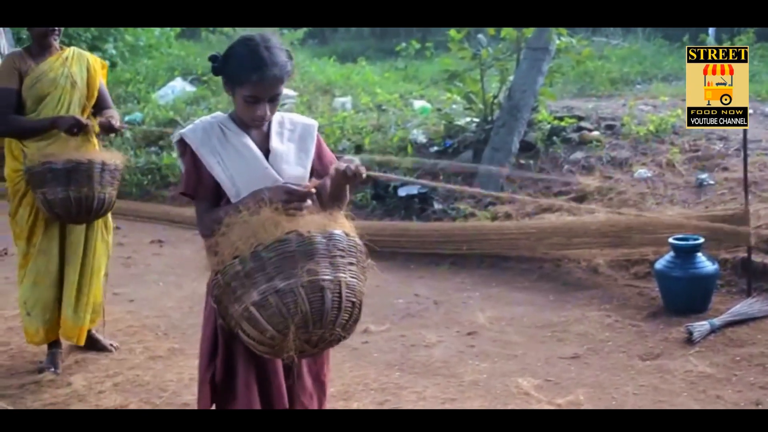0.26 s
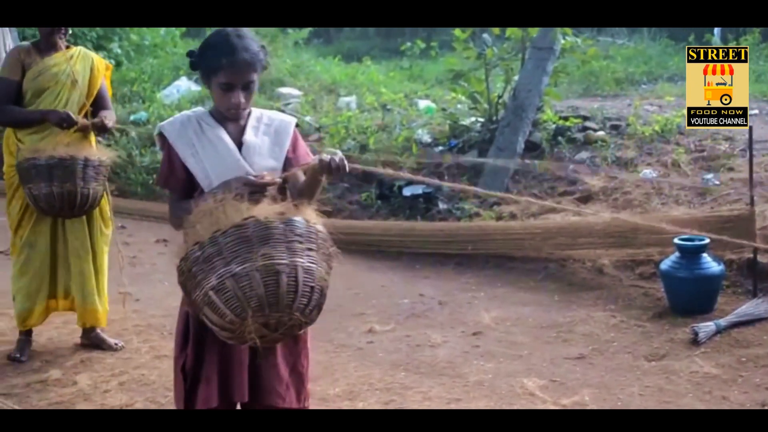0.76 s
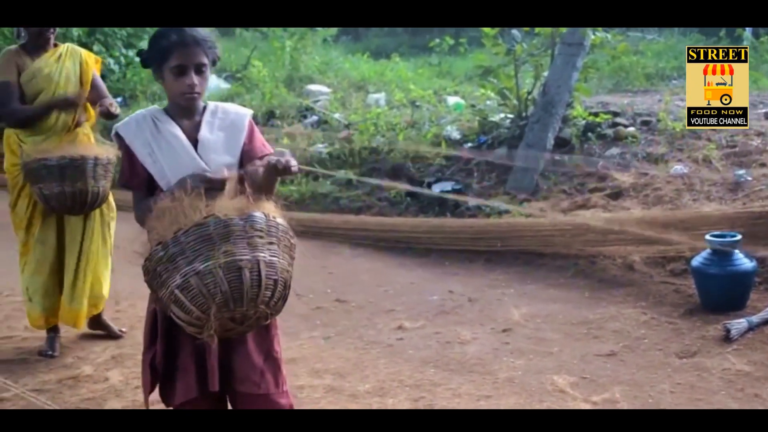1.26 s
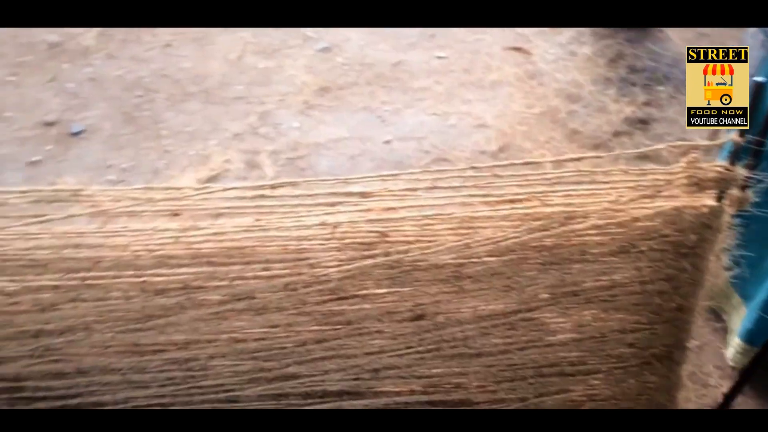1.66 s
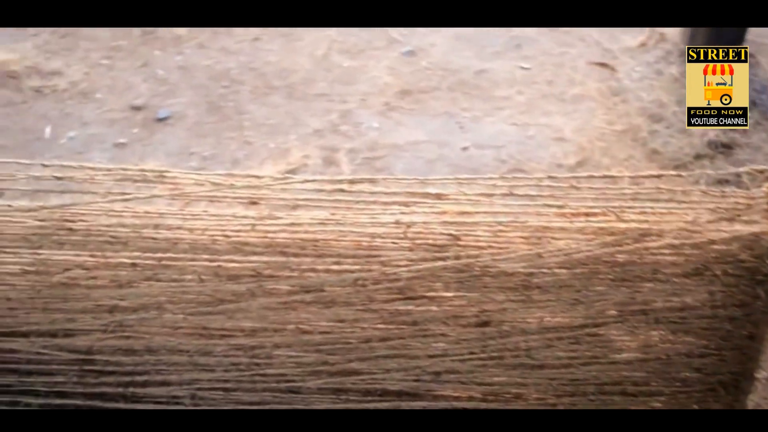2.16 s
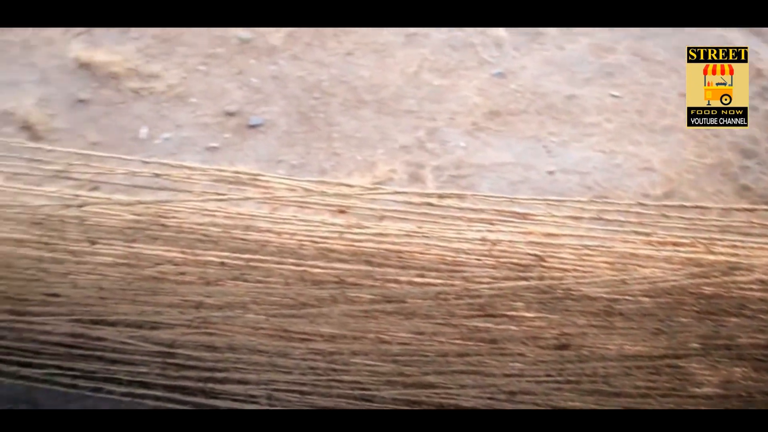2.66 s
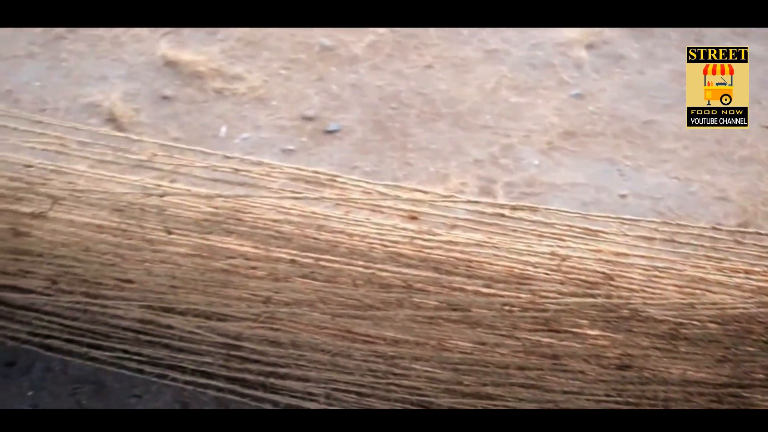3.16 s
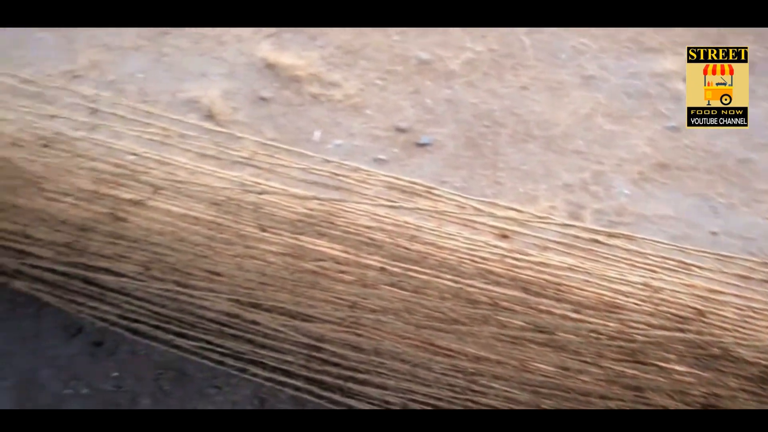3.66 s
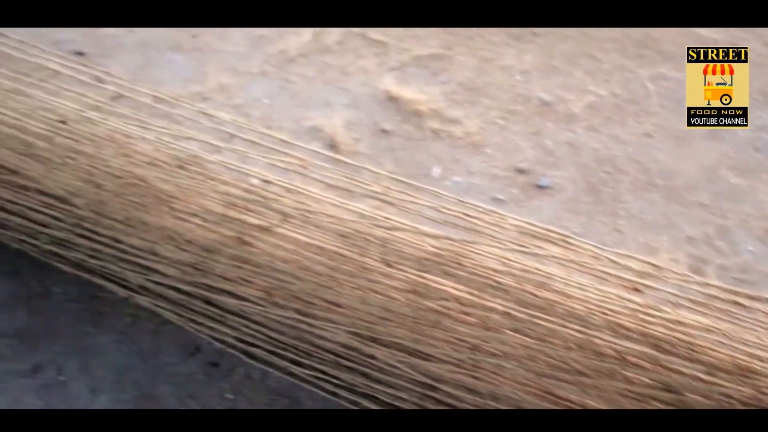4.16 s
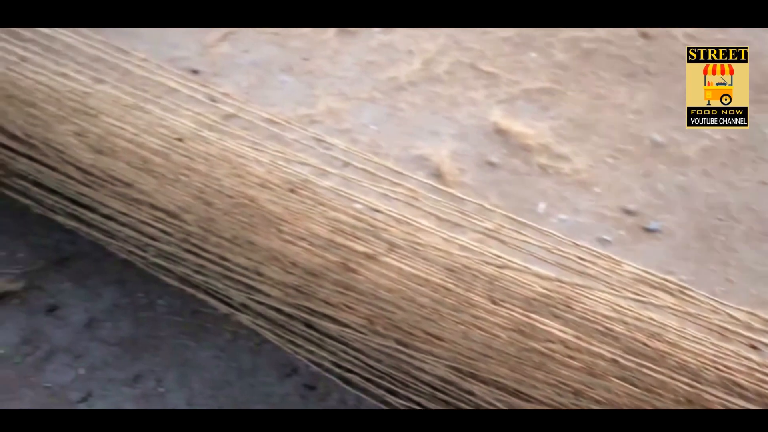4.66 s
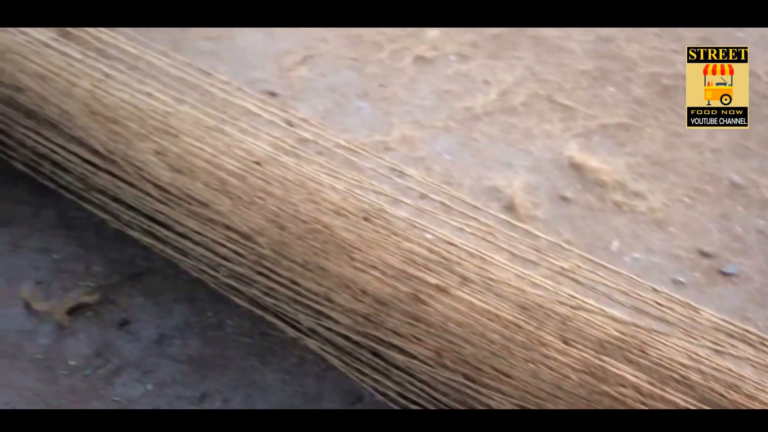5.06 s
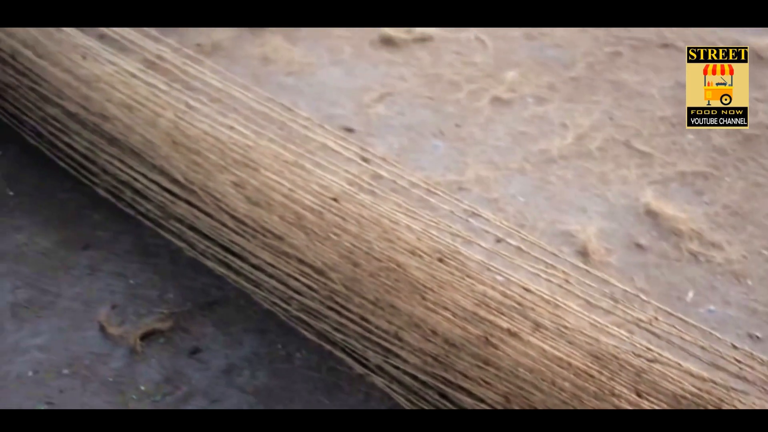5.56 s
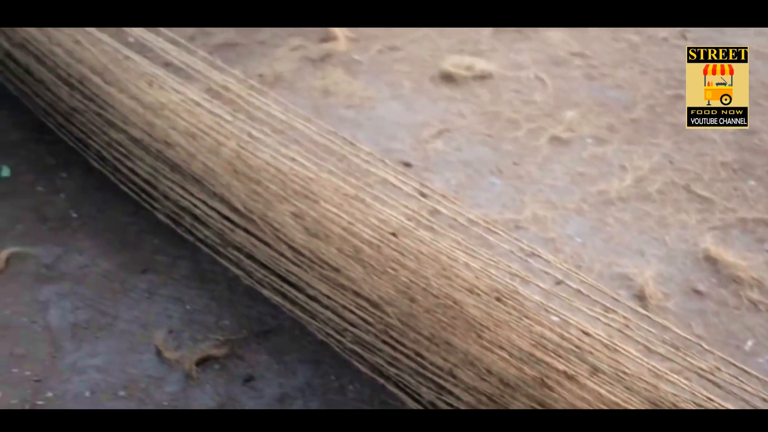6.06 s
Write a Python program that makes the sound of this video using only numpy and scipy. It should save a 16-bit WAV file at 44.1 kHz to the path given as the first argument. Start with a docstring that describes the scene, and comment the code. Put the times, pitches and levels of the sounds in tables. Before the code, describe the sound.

Two views of a hand-cranked twisting wheel outdoors, dry and without echo. First quiet, from the far end: brushing fibre, dull faint rattling, a slight whine. Then an abrupt cut to much louder close clatter of loose iron spindles and gears on a shaking wooden frame, with knocks, woody thumps and squeaky chirps. The listener walks away along the yarn, so the rattle thins and its fluttering, woody buzz becomes more noticeable.

```python
"""A hand-cranked wheel twists coir yarn in a village yard, heard first from the spinners' end, then beside it.
Loose iron spindles and gears chatter and ring, and shake the wooden frame; the clatter surges with each turn.
A wobbling gear thumps the frame, a dry bearing chirps, and the taut yarn flutters with the wheel's shaking.
Dry fibre rustles and the iron whines faintly at the spinners' end; open air is heard beside the wheel.
A faint low drone comes and goes. Beside the wheel, the listener drifts slowly away along the yarn."""
import sys
import numpy as np
from scipy import signal
from scipy.fft import rfft, irfft, next_fast_len
from scipy.io import wavfile
from scipy.ndimage import uniform_filter1d

SR = 44100
rng = np.random.default_rng(int(sys.argv[2]) if len(sys.argv) > 2 else 0)


def wav_out(sig):
    """Save sig, one row per channel (or a flat mono array), as 16-bit PCM at SR to the path in sys.argv[1]."""
    wavfile.write(sys.argv[1], SR, np.round(np.clip(np.atleast_2d(sig).T, -1, 1) * 32767).astype(np.int16))


N = 278271
T = np.arange(N) / SR  # seconds
# the filters work on a longer, padded stretch; HZ lists its frequencies
SIZE = next_fast_len(N + SR // 4, real=True) * 2
HZ = np.maximum(np.arange(SIZE // 2 + 1) * SR / SIZE, 1)

CLOSE_S = 1.482  # the listening place jumps to the wheel
WHEEL_M, WALK_M_S = 0.86, 0.6  # nearest distance to the wheel, and walking speed along the yarn

# Gear teeth catching with a knock. Each row: time in seconds, strength in dB before mixing,
# change of effort just before the knock in dB (negative where the gears run slack).
KNOCKS = [(0.718, -36, 4.5), (.857, -36, 7), (.942, -36, 6), (1.007, -39, 3.5), (1.172, -38, -1),
          (1.484, -40, 2), (1.522, -33.5, -6.5), (1.6312, -31.5, 2), (1.779, -23.5, -6), (1.81, -26.5, -3),
          (2.0614, -29, 2), (2.137, -30, -7), (2.238, -34, -1), (2.367, -39, -5.5), (2.4492, -30, -1),
          (2.712, -25.5, 0.5), (2.91, -28, -5), (3.003, -37, -7), (3.1176, -26, -1), (3.147, -30, -16),
          (3.185, -26, 0), (3.226, -31, 0.5), (3.3043, -30, 1), (3.335, -25, -1), (3.388, -43, -3.5),
          (3.709, -31.5, 4), (3.796, -33.5, -2), (3.9243, -36, -2), (3.968, -30.5, -5), (4.066, -33, 1),
          (4.096, -31.5, 5), (4.18, -30, 1), (4.2248, -40, -4.5), (4.2562, -36, -3), (4.2936, -32, 0.5),
          (4.365, -31, -4), (4.423, -31, 0), (4.6064, -45, 3.5), (4.778, -30, 2), (4.826, -32, 1),
          (4.957, -49, -4), (4.998, -34, -1.5), (5.094, -38, 3.5), (5.229, -33.5, -1), (5.322, -34.5, -5),
          (5.376, -34, 1.5), (5.431, -33.5, -5), (5.56, -34, -1), (5.597, -41, 0), (5.637, -41, 0.5),
          (5.711, -34, -3), (5.762, -33.5, 3.5), (5.9094, -42, -2), (6.135, -34.5, -0.5), (6.232, -37, -2),
          (6.262, -35, 0)]
# Chirps of the dry bearing. Each row: middle in seconds, half length in seconds, pitch in Hz,
# strength in dB, strength of the upper partial in dB relative to the pitch.
CHIRPS = [(0.518, .017, 8090, -72, -15), (.63, 0.0087, 8100, -68, -11), (1.71, 0.013, 7880, -43.5, -11),
          (1.712, .014, 4630, -41, -30), (1.744, 0.014, 8070, -44.5, -10.5),
          (1.935, 0.045, 6800, -53.5, -30), (1.937, 0.019, 4380, -45, -30), (1.99, 0.014, 4420, -38, -32),
          (2.022, 0.013, 4440, -37.5, -32), (2.053, .011, 4370, -45, -30),
          (2.147, 0.0084, 4300, -39.5, -28), (2.167, .006, 4390, -38, -28), (2.6, 0.023, 4600, -41.5, -26),
          (2.614, 0.027, 10300, -49.5, -4), (2.626, 0.01, 4530, -32, -26), (2.7, .022, 10500, -64, -6),
          (2.926, 0.0085, 7600, -47, -10), (3.34, 0.0087, 7660, -46.5, -9), (3.287, .012, 7980, -56, -10),
          (3.522, 0.0062, 10350, -64, -6), (3.982, 0.0059, 8000, -50, -12), (4.08, 0.013, 10350, -52, -6),
          (4.302, 0.011, 4530, -45, -30), (4.372, 0.0068, 4400, -49, -30), (4.607, 0.0091, 4510, -50, -32),
          (4.843, 0.014, 4510, -45, -13), (6.157, 0.011, 4430, -51, -30), (6.22, 0.057, 6266, -61.5, -30)]
# Resonances of the wooden frame. Each row: frequency in Hz, width in Hz, relative strength in dB.
FRAME_MODES = [(411, 110, -7.5), (919, 70, 4.5), (986, 45, -0.5), (1076, 82, 2.5), (1354, 85, 0),
               (1630, 180, 2), (2093, 45, 2.5)]
# Loudness of the fibre rustle at the spinners' end. Each row: time in seconds, level in dB.
FIBRE_LEVEL = [(.06, -48.5), (.3, -54), (.4, -51.5), (.47, -53.5), (.78, -55.5), (.87, -54.5), (1.05, -57),
               (1.4, -58)]


def undb(db):
    """Turn decibels into a plain amplitude factor."""
    return 10 ** (np.asarray(db) / 20)


def unit(x):
    """Scale to rms 1."""
    return x / np.sqrt(np.mean(x ** 2))


def curves(rows):
    """Each column of a table as a curve in time."""
    s, *columns = np.transpose(rows)
    return [np.interp(T, s, column) for column in columns]


def response(points):
    """Gain per frequency of a smooth spectrum, drawn through points of Hz and dB."""
    hz, db = np.transpose(points)
    return undb(np.interp(np.log(HZ), np.log(hz), db))


def ring(x, gain):
    """Causal filter with that gain, so that a body sounds only after each blow."""
    # folding the cepstrum forward in time gives the minimum-phase filter
    cepstrum = irfft(np.log(gain))[:SIZE // 2]
    cepstrum[1:] *= 2
    return irfft(rfft(x, SIZE) * np.exp(rfft(cepstrum, SIZE)))[:N]


def band(x, order, low_hz, high_hz):
    """Keep mainly what lies between two frequencies."""
    return signal.sosfilt(signal.butter(order, [low_hz, high_hz], "band", fs=SR, output="sos"), x)


def shelf(x, edge_hz, db, order=6):
    """Raise or lower everything above an edge."""
    treble = signal.sosfiltfilt(signal.butter(order, edge_hz, "high", fs=SR, output="sos"), x)
    return x + (undb(db) - 1) * treble


def walk(rate):
    """Smooth random drift with a spread near 1; it takes this many random steps a second."""
    k = int(SR / rate)
    steps = np.repeat(rng.standard_normal(N // k + 1), k)
    return 1.3 * uniform_filter1d(uniform_filter1d(steps, k), k)[:N]


def flicker(rate):
    """Quick random changes without slow swells, with a spread of 1."""
    drift = walk(rate)
    return unit(drift - uniform_filter1d(drift, size=SR // 25))


def bump(middle_s, half_s):
    """Smooth bell-shaped swell in time, with a peak of 1."""
    return np.exp(-((T - middle_s) / half_s) ** 2 / 2)


def fade(x, decay_s):
    """Give every impulse an exponential tail."""
    return signal.lfilter([1], [1, -np.exp(-1 / (decay_s * SR))], x)


def chatter(rate, scatter_db, decay_s, rub):
    """Contact force of loose parts: unevenly spaced taps of uneven strength over steady rubbing."""
    chance = rng.standard_normal((4000, 2))
    at = (np.cumsum(np.exp(.45 * chance[:, 0])) / rate * SR).astype(int)
    tap_power = undb(scatter_db * chance[at < N, 1]) ** 2
    power = fade(np.bincount(at[at < N], tap_power, N), decay_s)
    # the heavy wheel keeps the mean effort even
    power = power / (uniform_filter1d(power, size=SR // 24) + 1e-9)
    return np.sqrt((power + rub) / (1 + rub))


def grit(scatter_db):
    """Rough surfaces meeting: a dense stream of tiny clicks."""
    return unit(rng.standard_normal(N) * undb(scatter_db * rng.standard_normal(N)))


def together(*forces):
    """Unrelated forces add in power."""
    return np.sqrt(sum(force ** 2 for force in forces))


def sing(push, modes, flare_db, damping=1):
    """Resonances rung by a scraping contact; each flares and fades as the contact point wanders."""
    drive, out = push * grit(scatter_db=4), 0
    for hz, width, db in modes:
        # a narrower resonance rings longer
        pole = np.exp((2j * hz - width * damping) * np.pi / SR)
        share = undb(db + flare_db * walk(60))
        out = out + 2 * signal.lfilter([1 - abs(pole)], [1, -pole], drive * share).real
    return out


def patchy(x, patchy_db, rate):
    """Every contact has its own colour: half-octave bands flicker on their own."""
    place = np.clip(2 * np.log2(HZ / 500), 0, 9)
    spectrum = rfft(x, SIZE)
    out = 0
    for k in range(10):
        one_band = irfft(spectrum * np.maximum(1 - abs(place - k), 0))[:N]
        out = out + one_band * undb(patchy_db * flicker(rate))
    return out


def tones(rows, waver, flutter_db, rate, rasp=0):
    """Swelling tones, unsteady in pitch and strength; rasp jerks their phase."""
    drift = np.cumsum(1 + waver * walk(2 * rate)) / SR
    jerk = rasp * walk(3 * rate)
    out = np.zeros(N)
    for s, half, hz, db in rows:
        on = abs(T - s) < 4 * half
        swell = undb(db) * np.exp(-((T[on] - s) / half) ** 2 / 2)
        out[on] += swell * np.sin(2 * np.pi * hz * drift[on] + jerk[on])
    return out * undb(flutter_db * walk(rate))


def walked():
    """Metres the listener has gone along the yarn."""
    return WALK_M_S * np.maximum(T - CLOSE_S, 0)


def distance():
    """Metres from the walking listener to the wheel; it stays at its nearest value before the walk."""
    return np.hypot(WHEEL_M, walked())


def crank(follow):
    """Effort in dB: it swells to each push and eases half a turn later; parts follow that swing more or less."""
    # The hardest push of each turn of the crank. Each row: time in seconds, middle effort in dB,
    # swing above and below it in dB, before the follow factor.
    pushes = [(.12, -0.5, 2.5), (.88, 0, 0), (1.83, -0.5, 1), (2.58, 0.5, 0.65), (3.37, 0.9, 2),
              (4.08, 1.6, 0), (4.81, -0.3, 3), (5.65, 0, 4), (6.3, 1, 2)]
    s, db, swing_db = np.transpose(pushes)
    turns = np.interp(T, s, np.arange(len(s)))
    return np.interp(T, s, db) + follow * np.interp(T, s, swing_db) * np.cos(2 * np.pi * turns)


def jolts():
    """The crank jolts the wooden frame and the yarn tied to it: brief swells or dips in dB."""
    # Each row: middle in seconds, half length in seconds, swell in dB (negative is a dip).
    jolt_rows = [(1.735, 0.013, 5), (2.586, 0.021, 3.5), (3.39, 0.077, 2.5), (3.707, 0.01, -6),
                 (4.08, 0.032, 2.5), (4.66, 0.016, 1), (5.598, 0.0047, 7), (5.736, 0.013, 2)]
    return sum(db * bump(s, half) for s, half, db in jolt_rows)


def gear_slack():
    """Uneven meshing of the teeth, which often lose contact just before a knock, as an amplitude factor."""
    lead_s, half_s = 0.015, 0.012  # how long before its knock the change comes, and its half length
    change_db = sum(db * np.exp(-((T - s + lead_s) / half_s) ** 2) for s, _, db in KNOCKS)
    return undb(1.0 * flicker(130) + change_db)


def knocks(running, decay_s, rise_s):
    """Contact force of the knocks, each a short skid; the lighter ones follow the running clatter."""
    # lighter knocks: about this many a second, strength over the running clatter, scatter
    light_per_s, light_db, light_scatter_db = 25, 2, 4
    chance = rng.standard_normal((400, 2))
    at = (np.cumsum(np.exp(0.16 * chance[:, 0])) / light_per_s * SR).astype(int)
    peaks = undb(light_db + light_scatter_db * chance[at < N, 1])
    power = np.bincount(at[at < N], peaks ** 2, N) * running ** 2
    for s, db, _ in KNOCKS:
        power[int(s * SR)] += undb(db) ** 2
    # the second fade softens the start of each knock
    return np.sqrt(fade(fade(power, decay_s), rise_s) / (rise_s * SR))


def thump_force():
    """The wobbling spindle gear pushes on the frame: each thump swells quickly and lets go again."""
    # The clear thumps. Each row: peak in seconds, strength in dB before mixing.
    thump_rows = [(1.493, -51.5), (1.527, -49.5), (1.632, -47.5), (1.737, -51), (1.82, -46), (1.855, -59),
                  (1.901, -47.5), (1.939, -48), (1.982, -46.5), (2.076, -55), (2.144, -56), (2.241, -55),
                  (2.294, -61), (2.374, -51), (2.404, -47.5), (2.45, -48.5), (2.579, -52), (2.663, -57),
                  (2.706, -50), (2.792, -50.5), (2.842, -52), (2.943, -50), (3.009, -50), (3.124, -57),
                  (3.169, -53), (3.219, -51), (3.265, -53), (3.319, -53), (3.348, -52), (3.392, -47.5),
                  (3.421, -48), (3.477, -52), (3.518, -55), (3.607, -52), (3.68, -53), (3.713, -47),
                  (3.795, -52), (3.831, -51.5), (3.932, -50.5), (3.989, -50), (4.098, -49.5), (4.156, -49),
                  (4.223, -51), (4.422, -53), (4.566, -54.5)]
    rise_s, fall_s = 0.0048, 0.0048
    return sum(undb(db) * bump(s, np.where(T < s, rise_s, fall_s)) for s, db in thump_rows)


def grinding():
    """Contact force of the dry bearing, which also grinds on the iron while it chirps."""
    return sum(undb(db - 10.5) * bump(s, half) for s, half, _, db, _ in CHIRPS)


def iron_parts(force, effort):
    """Iron spindles and gears: a dry scrape of iron on iron, and the ringing of their resonances."""
    # Spectrum of the dry scrape. Each row: frequency in Hz, relative level in dB.
    scrape_points = [(1500, -24), (2650, -6), (3200, 5), (4600, 6.5), (4850, 1), (5300, -0.5), (5900, -2),
                     (7000, -5), (8700, -11), (10200, -26), (14000, -38), (15500, -45)]
    # Ringing of the spindles and gears. Each row: frequency in Hz, width in Hz before the
    # damping factor, relative strength in dB.
    iron_modes = [(3130, 90, 3), (3360, 80, 7.5), (3620, 160, 4.5), (3800, 90, 1), (4190, 55, 8.5),
                  (4340, 50, 8.5), (4420, 36, 14), (4554, 34, 14), (5062, 42, 11.5), (5130, 40, 5),
                  (5620, 90, -3), (6140, 50, -2), (6266, 26, 7.5), (6790, 30, -7), (7380, 40, -5),
                  (7650, 42, 3), (7845, 35, -6), (8000, 40, 0), (8110, 50, -3), (8850, 80, -10),
                  (10290, 35, -11), (11547, 40, -8), (11897, 40, -10)]
    scrape = ring(force * grit(scatter_db=3.0), response(scrape_points)) * undb(3.0)
    # the turning shafts keep the iron ringing between taps
    ringing = sing(np.hypot(force, effort), iron_modes, flare_db=3.0, damping=0.74) * undb(0.7)
    return scrape + ringing


def wooden_frame(force):
    """Shaken wood: its resonances sing, with a dull rattle between them."""
    # Spectrum of the dull rattle. Each row: frequency in Hz, relative level in dB.
    rattle_points = [(100, -34), (300, -14), (620, -25.5), (850, -8.5), (1200, -1), (1500, -2), (2300, 2),
                     (2700, -13), (5000, -25.5)]
    rattle = ring(force * grit(scatter_db=-1.0), response(rattle_points)) * undb(9)
    singing = sing(force, FRAME_MODES, flare_db=1.9) * undb(11.0)
    # wood gives back little treble
    return band(rattle + singing, 2, 410, 3800)


def thumps(force):
    """Hollow knocking of the frame, a little different in colour each time."""
    # a soft blow wakes mainly the hollow resonances near 900 to 1000 Hz
    wood = band(sing(1, FRAME_MODES, flare_db=2), 2, 843, 1052)
    steady_wood = wood / np.sqrt(uniform_filter1d(wood ** 2, size=SR // 90) + 1e-12)
    return force * steady_wood


def wheel(close):
    """Spindle taps ring the iron parts and shake the frame; slack in the gears interrupts them."""
    # driving strengths in dB: iron heard close, iron from the spinners' end, frame heard close
    iron_db, far_iron_db, frame_db = -47, -62, -54.5
    spread = WHEEL_M / distance()
    running = undb(crank(follow=0.93) + np.where(close, iron_db, far_iron_db)) * spread
    rocking = undb(crank(follow=1.1) + jolts() + frame_db) * spread * close
    slack = gear_slack()
    effort = slack * running
    taps = chatter(rate=160, scatter_db=1.0, decay_s=0.0028, rub=0.1)
    hard = knocks(running * close, decay_s=0.004, rise_s=0.0021)
    thump = thump_force()

    iron_force = together(taps * effort, undb(-14.0) * hard, undb(-1.5) * thump, grinding())
    # the frame also rocks on its own joints
    rocking_taps = chatter(rate=130, scatter_db=-1.5, decay_s=0.0044, rub=0.58)
    joints = together(undb(-2) * taps, rocking_taps)
    frame_force = together(joints * slack * rocking, undb(-19.5) * hard, undb(-7) * thump)

    out = iron_parts(iron_force, effort) + wooden_frame(frame_force)
    # small parts radiate no bass
    out = signal.sosfilt(signal.butter(2, 260, "high", fs=SR, output="sos"), out)
    out = patchy(out, patchy_db=1.8, rate=170) * undb(-0.6) + thumps(thump) * undb(-1)
    # from the spinners' end the wheel is dull
    out = shelf(out, edge_hz=4240, db=np.where(close, 0, -9), order=14)
    # treble is beamed, so it is the first to go with distance: 4 dB a metre beyond 2.2 m
    return shelf(out, edge_hz=6800, db=-4 * np.maximum(distance() - 2.2, 0))


def fibre():
    """Dry coir fibre rustles as the spinners feed it to the turning yarn."""
    # Spectrum of fibre drawn from the baskets. Each row: frequency in Hz, relative level in dB.
    fibre_points = [(60, -24), (100, -16), (140, -9.5), (180, -11.5), (250, -4), (500, -1.5), (750, -1.5),
                    (1100, 1.5), (1500, -2), (2700, -5.5), (3700, -9.5), (4400, -12.5), (4800, -18),
                    (6300, -19), (10000, -31.5), (15000, -35)]
    pull = chatter(rate=220, scatter_db=3.5, decay_s=0.0011, rub=2.4)
    rustle = ring(pull * grit(scatter_db=1.5), response(fibre_points))
    rustle = patchy(rustle, patchy_db=1.5, rate=60)
    return unit(rustle) * undb(curves(FIBRE_LEVEL)[0] + 0.27 * walk(17.5))


def yarn(close):
    """The taut yarn carries the wheel's shaking along and flutters with it, least at its tied end."""
    # Body tones of the long yarn bundle. Each row: frequency in Hz, width in Hz, relative strength in dB.
    yarn_modes = [(220, 29, -7), (462, 67, -1.5), (680, 240, -8.5), (1099, 55, 5.5), (1224, 115, 0.5),
                  (1390, 74, 0), (1660, 104, 2), (2450, 82, 1), (3030, 130, 2)]
    # driving strength well along the yarn, change at its tied end, and the reach of that change
    yarn_db, end_db, end_m = -46.5, -24.5, 0.76
    along_db = yarn_db + crank(follow=0.92) + jolts() + end_db * np.exp(-walked() / end_m)
    # at the spinners' end the yarn follows the fibre rustle
    db = np.where(close, along_db, curves(FIBRE_LEVEL)[0] - 5.5)
    shake = chatter(rate=75, scatter_db=3.0, decay_s=0.0051, rub=0.6) * undb(db)
    return band(sing(shake, yarn_modes, flare_db=3.5), 3, 280, 4000)


def whine():
    """The spinning iron sings faintly from afar: noise rings one narrow resonance."""
    mode_hz, mode_width_hz, whine_db = 4510, 54, -74
    tone = unit(sing(1, [(mode_hz, mode_width_hz, 0)], flare_db=7.0))
    return tone * undb(whine_db + crank(follow=1.0))


def drone():
    """A faint low drone that comes and goes: swelling tones of wavering pitch."""
    # Each row: middle in seconds, half length in seconds, pitch in Hz, strength in dB before flutter.
    drone_rows = [(.03, 0.032, 135, -69), (.13, 0.026, 157, -63), (.14, .03, 232, -62),
                  (.5, 0.22, 139, -76), (.87, 0.034, 144, -69), (.87, .2, 216.3, -71.5),
                  (1.2, 0.035, 133, -71), (1.95, 0.36, 140.8, -88), (3.62, 0.074, 101, -80),
                  (4.25, .061, 109, -82), (4.95, 0.29, 226, -78.5), (5.27, .05, 104.4, -81)]
    return tones(drone_rows, waver=0.025, flutter_db=3.0, rate=17)


def chirps():
    """A dry bearing sticks and slips, briefly locking onto a rasping iron tone, its octave and a weaker partial."""
    lower = [(s, half, hz, db) for s, half, hz, db, _ in CHIRPS]
    # the partial lies a fixed 3780 Hz above the pitch
    upper = [(s, half, hz + 3780, db + rel) for s, half, hz, db, rel in CHIRPS]
    octave = [(s, half, 2 * hz, db - 26) for s, half, hz, db, _ in CHIRPS]
    slips = chatter(rate=130, scatter_db=2, decay_s=.005, rub=.6)
    slips = uniform_filter1d(slips, size=SR // 500)
    return slips * tones(lower + upper + octave, waver=.006, flutter_db=1.2, rate=240, rasp=.4)


def yard():
    """Soft, slowly wavering outdoor noise that grows louder as the wheel grows fainter."""
    # Spectrum of the open air. Each row: frequency in Hz, relative level in dB.
    air_points = [(25, -14), (50, -9.5), (100, 0), (160, 0), (210, 3), (310, 3), (440, 7.5), (600, 8.5),
                  (1100, 8), (2000, 8), (5000, 0.5), (14000, -64)]
    beside_db, growth = -67, 0.58  # level beside the wheel, and dB gained per dB that the wheel recedes
    air = unit(ring(rng.standard_normal(N), response(air_points)))
    return air * undb(beside_db + 2.5 * walk(6.8)) * (distance() / WHEEL_M) ** growth


def scene():
    """Both listening places, heard in mono."""
    close = T >= CLOSE_S
    background = np.where(close, yard(), fibre() + whine())
    mono = wheel(close) + yarn(close) + drone() + chirps() + background
    return np.array([mono, mono])


def record(dry):
    """The microphone drops away above 10 kHz, and a steep filter cuts the top above 15.7 kHz."""
    # points of Hz and dB
    gain = response([(20, -1.0), (10350, -1.0), (10750, -16.0), (14300, -18.0), (14900, -29)])
    heard = np.array([ring(channel, gain) for channel in dry])
    return signal.sosfilt(signal.ellip(8, .2, 70, 15700, fs=SR, output="sos"), heard)


dry = scene()
out = record(dry)
wav_out(out)
```